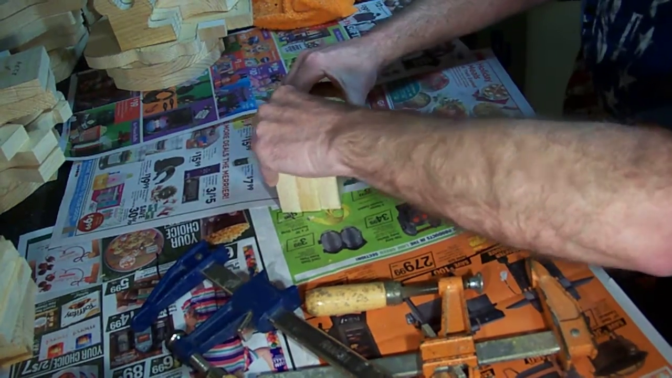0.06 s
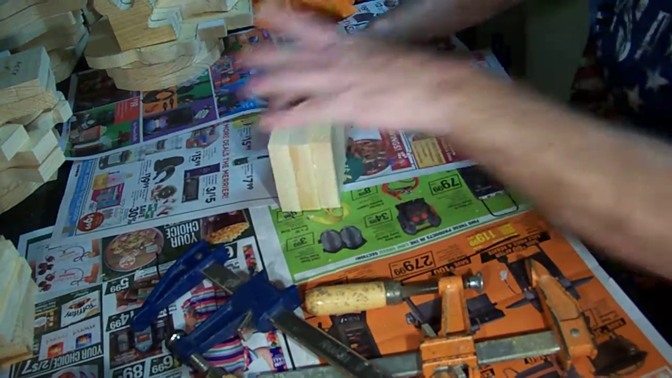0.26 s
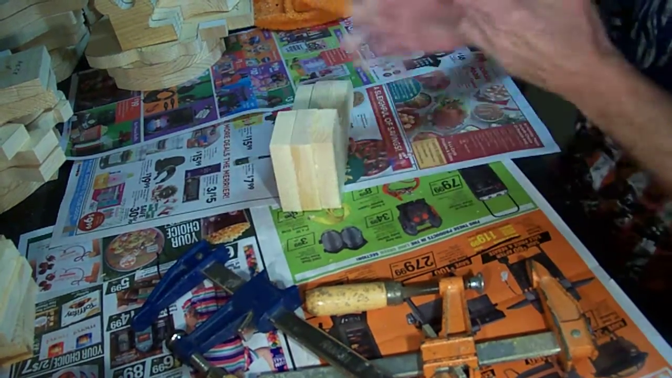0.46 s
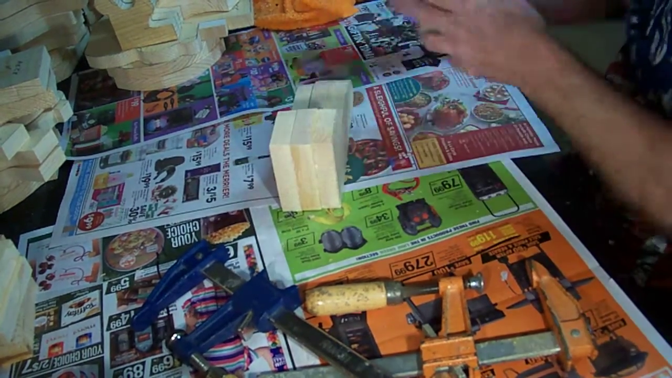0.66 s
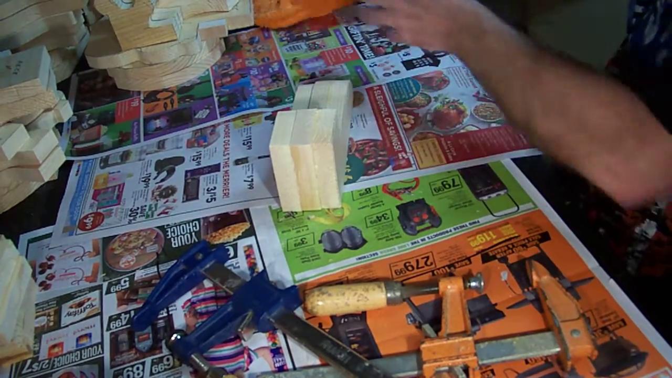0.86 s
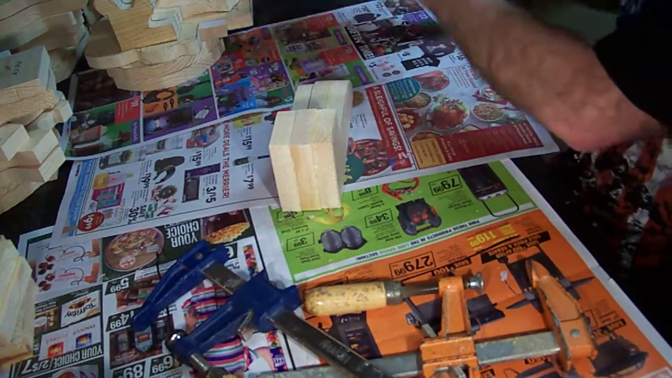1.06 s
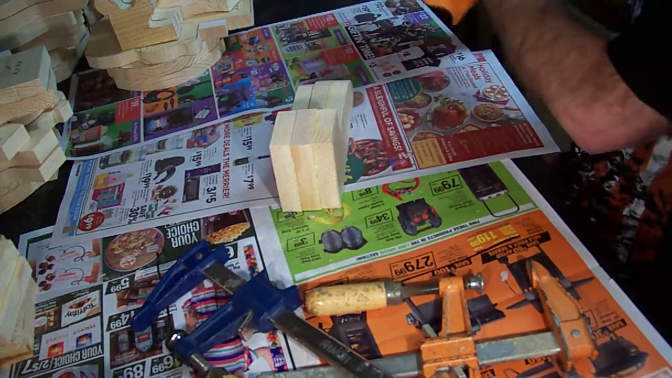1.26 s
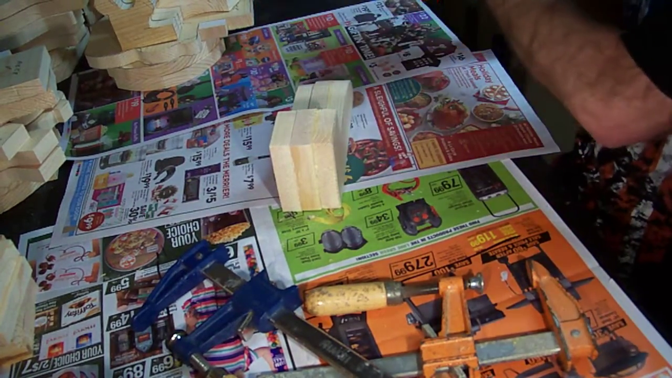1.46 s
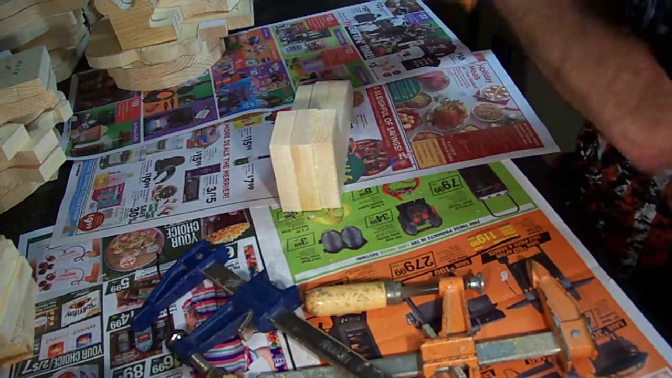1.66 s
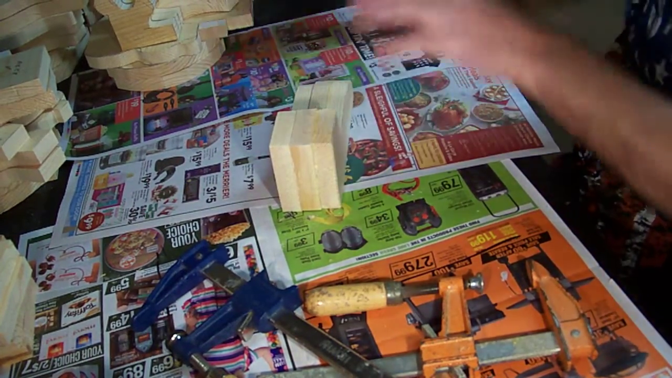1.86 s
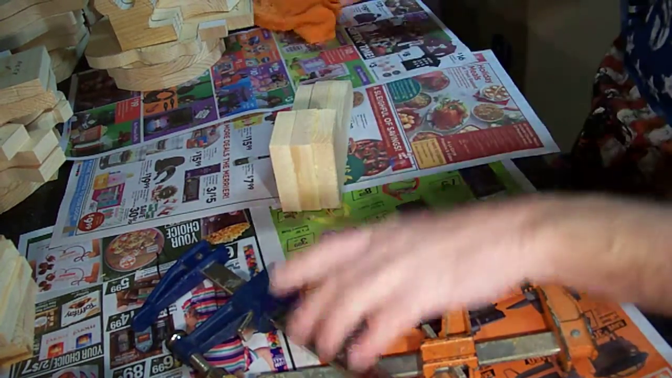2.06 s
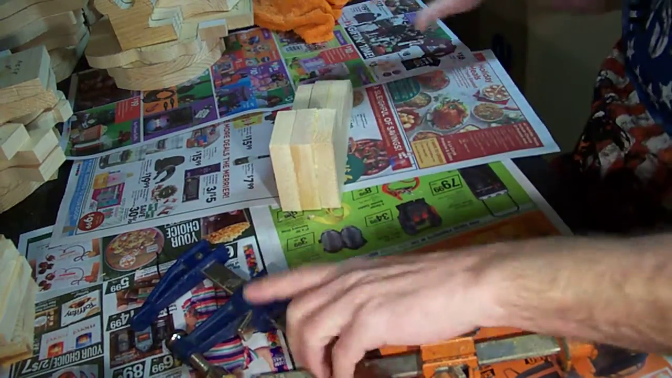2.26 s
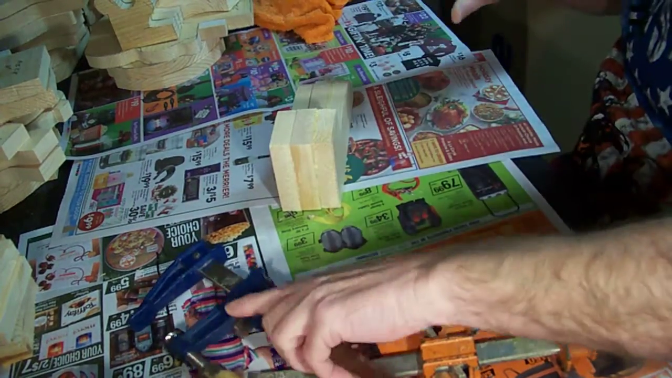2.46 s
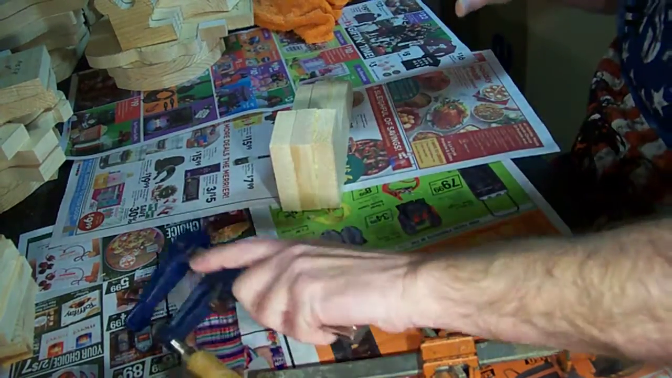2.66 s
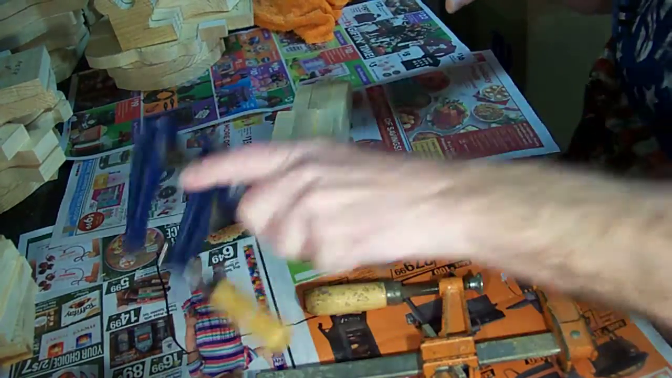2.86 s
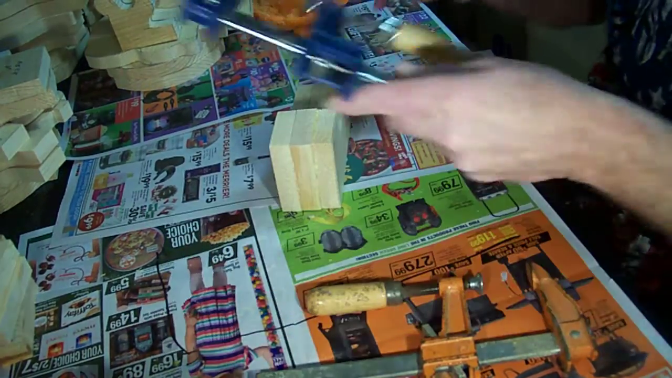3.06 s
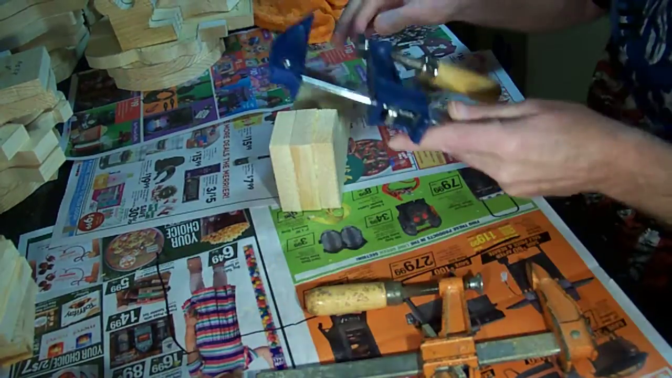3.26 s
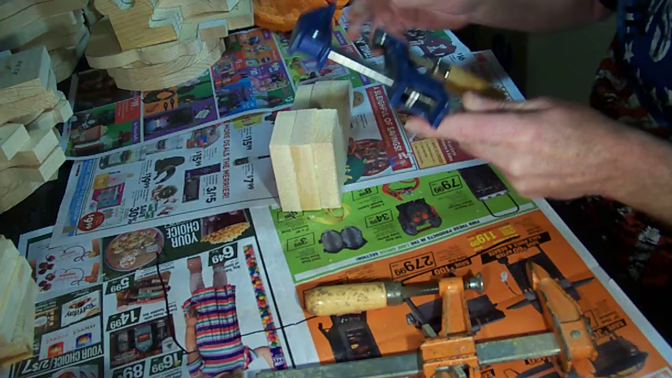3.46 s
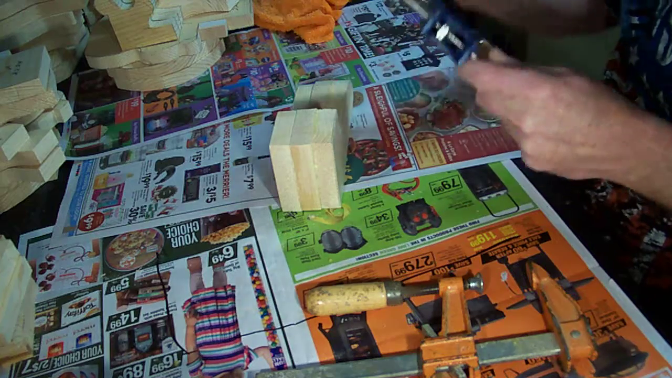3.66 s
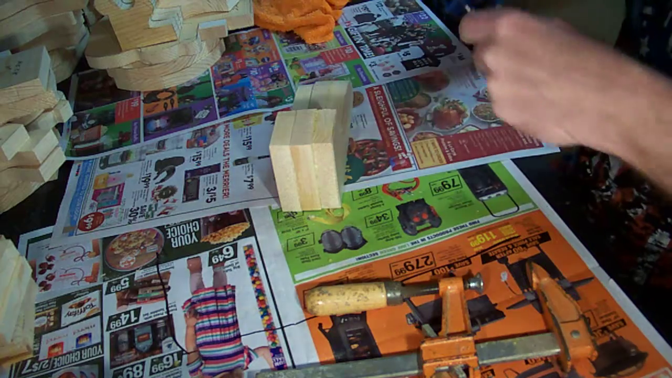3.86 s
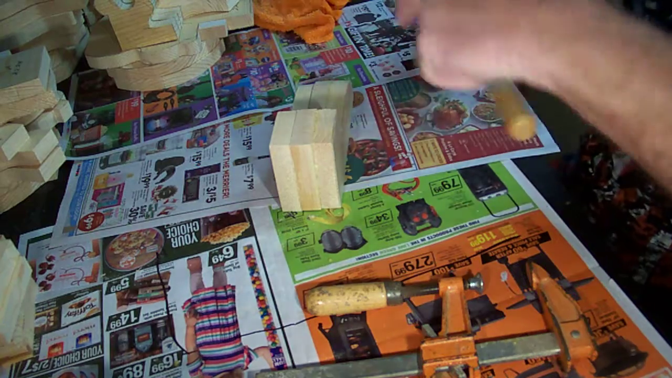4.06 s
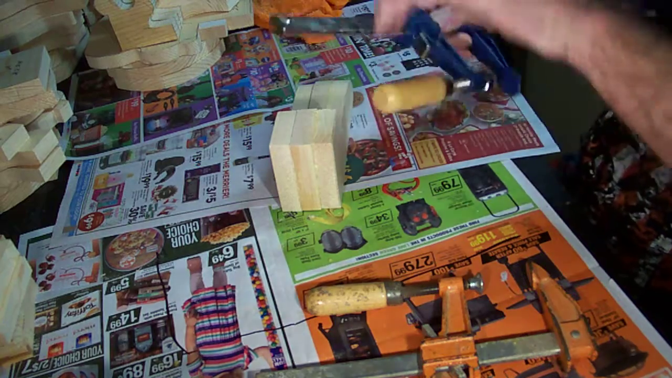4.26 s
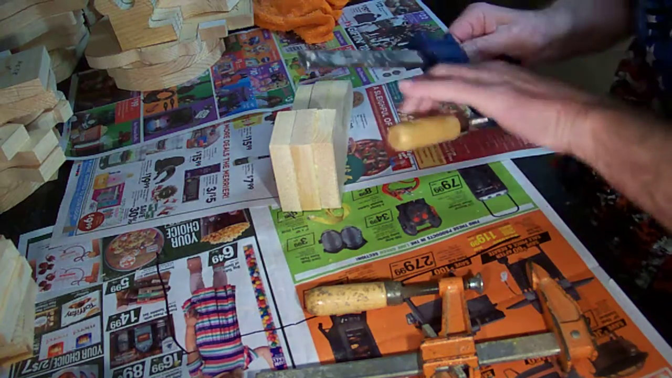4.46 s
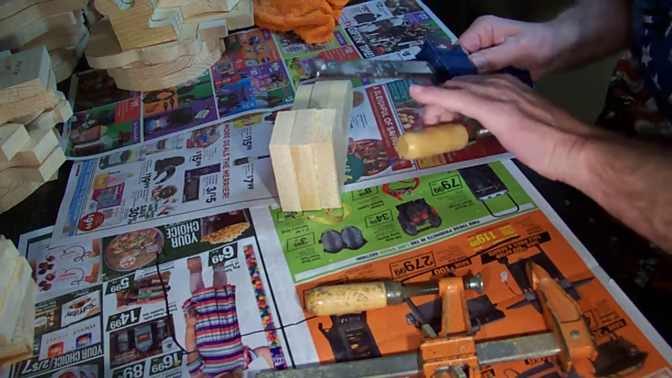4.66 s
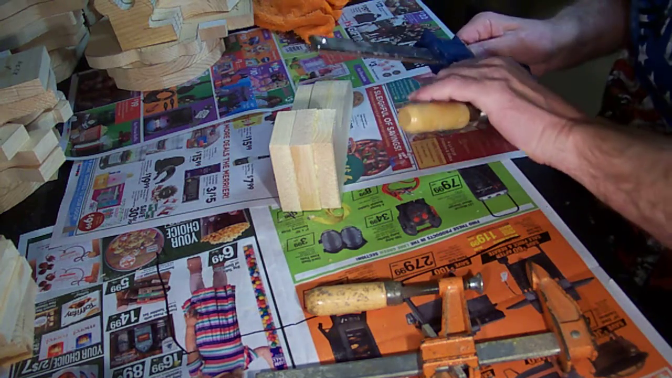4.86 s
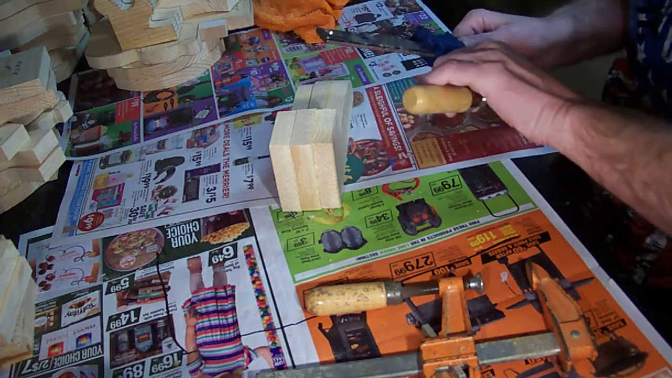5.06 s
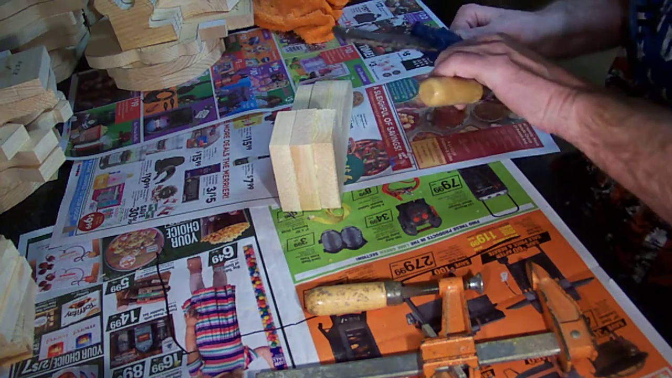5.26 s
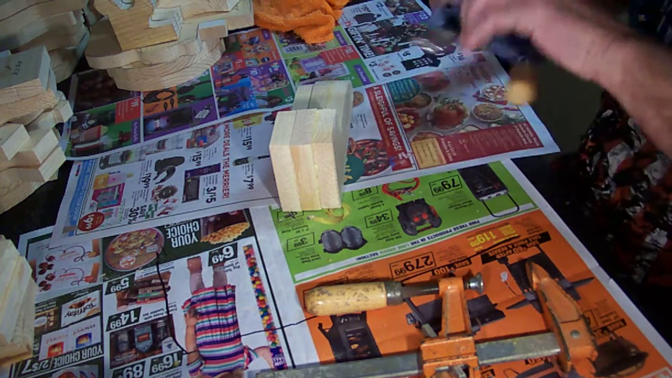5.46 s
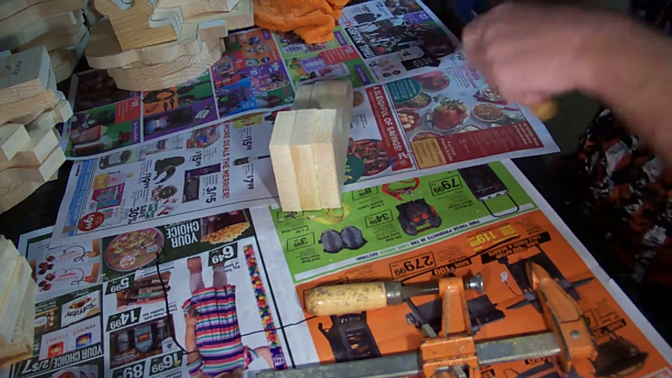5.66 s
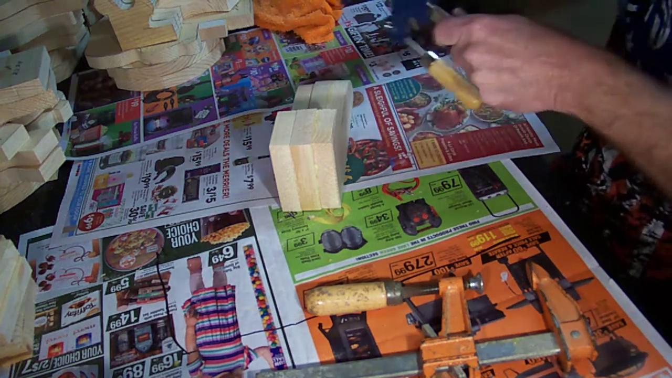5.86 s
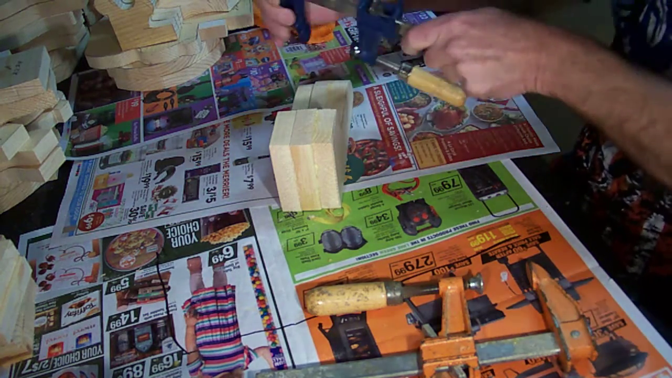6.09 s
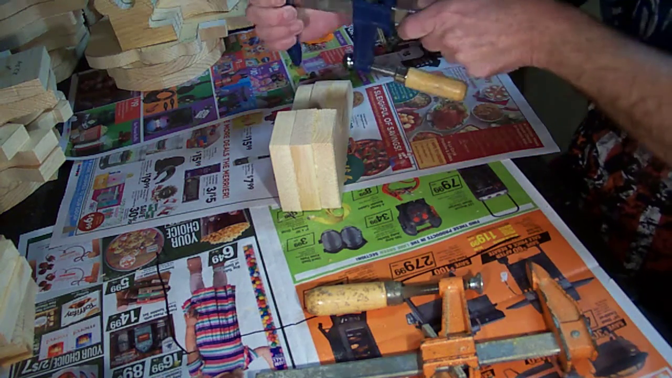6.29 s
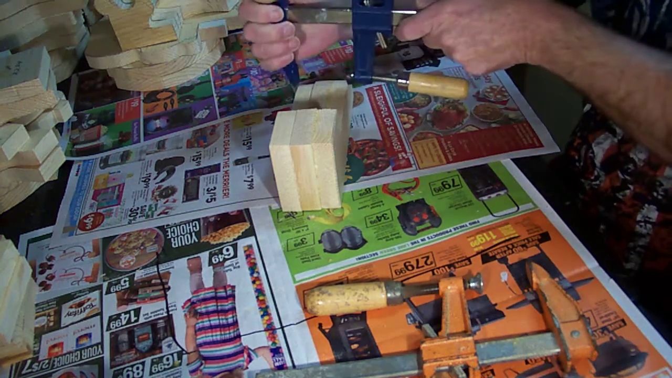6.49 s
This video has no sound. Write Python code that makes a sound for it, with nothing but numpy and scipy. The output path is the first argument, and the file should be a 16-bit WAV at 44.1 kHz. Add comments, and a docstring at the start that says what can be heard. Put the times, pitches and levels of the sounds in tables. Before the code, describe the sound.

In a small workshop, hands lightly brush wood blocks and newspaper on a table. A steel bar clamp is picked up, knocking and dragging so the tabletop thuds. Its loose jaw and screw then click, slide and rattle on the bar with a brief metallic ring. One hard snap stands out, followed by light clicks and a faint slide. The sounds are close and slightly left, over low rumble and soft hiss.

```python
"""A small workshop: low room rumble and soft hiss throughout. First, hands brush wood blocks and the
newspaper covering a table. From about 2.3 s a steel bar clamp is picked up: it knocks and drags, and
the table top thuds. From 3.2 s it is turned in the hands, and its loose jaw and screw slide, click and
rattle on the bar, making the steel ring. One hard snap lands at 5.4 s; light clicks and a faint
slide close the scene."""
import sys
import numpy as np
from scipy import signal
from scipy.fft import rfft, next_fast_len
from scipy.io import wavfile

SR = 44100
rng = np.random.default_rng(int(sys.argv[2]) if len(sys.argv) > 2 else 0)


def bounce(signal):
    """Save signal as a 16-bit WAV file at the path given by the first command-line argument."""
    frames = np.transpose(np.atleast_2d(signal))
    limited = np.clip(frames, -1, 1)
    pcm = np.round(limited * 32767).astype(np.int16)
    wavfile.write(sys.argv[1], SR, pcm)


N = 287973
HIT_T = np.arange(SR // 4) / SR  # time axis of one hit, in seconds

# jaw and screw strike the bar: start_s, level_db, pitch_hz (of the struck part), treble_db (re level)
CLICKS = [(2.2706, -20, 5070, -9), (2.3626, -43, 6250, 5), (2.367, -23.5, 2390, -10),
          (2.424, -21, 5900, -6), (2.4648, -18, 2970, -6), (2.548, -33, 3430, -17),
          (2.5596, -16.5, 3740, -12), (2.595, -28.5, 3680, -4), (2.669, -38.5, 3420, -12),
          (3.2381, -38.5, 3070, -4), (3.243, -33, 2800, -9), (3.26, -23, 3560, -6.5),
          (3.2974, -32.5, 3470, -4.5), (3.314, -43.5, 3500, -16), (3.9761, -36, 3500, -12),
          (3.9824, -38, 3580, -10), (4.055, -48, 3000, -7), (4.0616, -40.5, 4000, -3.5),
          (4.1568, -49.5, 4080, 5), (4.404, -34, 2890, -19), (4.784, -37, 4980, -13),
          (4.8065, -18.5, 2940, -8.5), (4.8428, -22, 5330, -10.5), (4.8462, -20, 6140, -14),
          (4.997, -33, 2540, -30), (5.0083, -26, 3640, -25), (5.034, -37.5, 3600, -19),
          (5.1572, -38, 2610, -24), (5.211, -42.5, 2160, -25), (5.286, -47, 2530, -16),
          (5.3142, -41.5, 2390, -30), (5.37, -33, 2650, -20), (5.379, -21, 5370, -2),
          (5.4042, -34, 2490, -25), (5.4213, -30, 6910, -9), (5.4284, -5, 5500, -0.5),
          (5.478, -31, 7200, -3), (5.6904, -35, 2920, 2.5), (5.718, -39, 4400, -3),
          (5.751, -29.5, 3610, -3), (5.7691, -26.5, 6870, -6.5), (5.8073, -39.5, 3670, -3),
          (5.8552, -31, 3540, 2), (5.893, -35, 7000, -6), (5.905, -36, 3480, -3), (5.911, -27, 7350, -1)]
# ring of the steel bar and jaw: pitch_hz, level_db, t60_s
CLAMP_MODES = [(2710, -6, .04), (2937, -1.5, .055), (3150, 0.5, 0.047), (3450, -2, 0.045),
               (3910, -3, 0.044), (4330, -6.5, 0.087), (4700, -1.5, 0.043), (4830, -3.5, .06),
               (5120, 4.5, 0.021), (5240, -6, 0.05), (5580, -2.5, .055), (6200, -2.5, 0.044),
               (6520, -7, .06), (7150, -1, 0.044), (7360, -7, 0.051), (7800, -11, .06)]
# the jaw slides along the bar: centre_s, half_length_s, level_db
JAW_SLIDES = [(3.25, 0.051, -57), (3.368, 0.075, -64), (3.962, 0.026, -59), (4.16, 0.043, -60.5),
              (4.512, 0.012, -59.5), (5.025, 0.017, -46), (5.407, 0.034, -55), (5.74, 0.037, -50.5),
              (5.885, 0.038, -58.5), (6.365, 0.37, -65.5)]
# the clamp bumps the table: start_s, thump_db, clack_db
KNOCKS = [(2.272, -34, -47.5), (2.368, -24, -22.5), (2.378, -43, -37), (2.387, -33.5, -33.5),
          (2.426, -52, -38.5), (2.467, -61, -37.5), (2.511, -31, -46), (2.562, -31, -45), (2.595, -40, -42),
          (5.429, -59, -39)]
# thud of the table top: pitch_hz, level_db, t60_s
TABLE_MODES = [(91, -8.5, 0.079), (111.8, 2.5, 0.16), (163.6, -6.5, 0.17), (191.4, 2.5, 0.075),
               (261, -7.5, 0.017), (362, -4.5, 0.03), (465, -6, 0.073), (550, -20.5, 0.11),
               (740, -25, 0.027)]
# woody tone of a knock: frequency_hz, level_db
CLACK_EQ = [(150, -6), (400, 13), (750, 5), (1000, 1), (1500, -2), (2500, -31), (5000, -17)]
# hands brush, the clamp drags: centre_s, half_length_s, hiss_db, rasp_db, pressure_db
RUBS = [(0.194, 0.021, -51, -76, -50.5), (0.324, 0.015, -49.5, -75, -72), (.33, 0.19, -64.5, -66.5, -59.5),
        (1.655, 0.021, -50, -51.5, -55), (2.057, 0.012, -41.5, -58, -43.5),
        (2.096, 0.018, -45.5, -58, -36.5), (2.246, 0.031, -65, -72, -48), (2.385, 0.017, -48.5, -54, -33.5),
        (2.446, 0.034, -52.5, -61, -41), (2.555, 0.015, -42, -50, -37), (2.606, 0.038, -49.5, -67, -36.5),
        (2.714, 0.052, -74, -79, -48.5)]
# bright hiss of sliding surfaces: frequency_hz, level_db
FRICTION_EQ = [(600, -18), (1300, -12.5), (2200, -5.5), (3300, 2), (5000, 1), (7500, -5)]
# midrange scrape of paper: frequency_hz, level_db
SCRAPE_EQ = [(200, -13.5), (380, 4), (550, 3), (800, -6.5), (1200, -5), (2200, -22.5)]
# low end of rubbing pressed into the table: frequency_hz, level_db
PRESSURE_EQ = [(40, -20.5), (85, 1.5), (120, 0.5), (175, 0.5), (240, -11), (400, -40.5)]
# slaps off hard surfaces nearby: delay_s, level_db, pan_db (left over right)
ECHOES = [(.0021, -23, 3), (.0063, -18.5, -13.5), (.0082, -26, 10)]
# low bed of the room tone: frequency_hz, level_db
ROOM_RUMBLE_EQ = [(10, 0), (22, 5), (31, -4.5), (43, 3.5), (56, 1), (76, -1.5), (97, 4.5), (135, -11.5),
                  (195, -11), (260, -26.5), (450, -34.5), (750, -25), (1100, -37), (4000, -50)]
# airy bed of the room tone: frequency_hz, level_db
ROOM_HISS_EQ = [(100, 9), (450, 4.5), (750, 2), (1100, 0.5), (2000, -1.5), (4000, -3), (7200, -6)]
# notches in the microphone's response: frequency_hz, width_hz
MIC_DIPS = [(300, 102), (962, 69)]

MEDIUM_BLOW_DB, MEDIUM_PART_HZ, MEDIUM_TREBLE_DB = -36.5, 3500, -11  # a middling click
LEFT_PAN_DB, NEAR_CENTRE_PAN_DB = 8.5, 1
RING_SPREAD_DB = 3.5  # hit-to-hit variation of each clamp mode


def clamp_clicks(damped_until_s=3.6, part_t60_s=0.02, take_up_s=0.0005):
    """Steel hits steel: each contact cracks, wakes the bar and chatters on the loose part it struck."""
    out = np.zeros((2, N))
    for start_s, level_db, pitch_hz, treble_db in CLICKS:
        hardness_db = level_db - MEDIUM_BLOW_DB
        damping_db = 4 * (start_s < damped_until_s)  # the early clicks ring less
        force = contact(chatter_db=17.5 + 0.5 * hardness_db)
        part_ring = signal.fftconvolve(force, ringing([(pitch_hz, 0, part_t60_s)], spread_db=0))
        # hard blows on heavy, low-ringing parts carry the most body
        body_db = -28 + 0.22 * hardness_db - 6.5 * np.log2(pitch_hz / MEDIUM_PART_HZ)
        # a soft contact with little treble also cracks less
        crack_db = -13 + 0.24 * (treble_db - MEDIUM_TREBLE_DB)
        # a light touch mostly rings, a hard one mostly cracks
        ring_db = -6 - 0.47 * hardness_db - damping_db
        layers = [(band(force, 800, 1900), body_db, NEAR_CENTRE_PAN_DB),
                  (band(force, 2630, 4940, order=3), crack_db, LEFT_PAN_DB),
                  (band(force, 4640, 9160, order=3), treble_db - 2, NEAR_CENTRE_PAN_DB),
                  (ringing(CLAMP_MODES, RING_SPREAD_DB), -14 - damping_db, NEAR_CENTRE_PAN_DB),
                  (part_ring[:len(force)], ring_db, LEFT_PAN_DB)]
        for sound, trim_db, pan_db in layers:
            layer = from_db(level_db + trim_db) * burst(sound, seconds=0.0023)
            add(out, start_s + take_up_s, panned(layer, pan_db))
    left, right = out
    return np.array([left, np.append(0, right[:-1])])  # off to the left: the right hears it a sample late


def sliding_jaw(ticks_per_s=60, slide_db=-3, crack_db=-6.5, ring_db=-9, size_spread_db=3):
    """Steel slides on steel; random light ticks ride the motion and wake the bar."""
    motion = sum(from_db(db) * swell(centre_s, half_s) for centre_s, half_s, db in JAW_SLIDES)
    catches = rng.random(N) < ticks_per_s / SR
    sizes = from_db(size_spread_db * rng.standard_normal(N))
    ticks = motion * rms_one(catches * sizes)
    crack = from_db(crack_db) * burst(band(contact(chatter_db=13.5), 1500, 6000), 1 / SR)
    ring = from_db(ring_db) * burst(ringing(CLAMP_MODES, RING_SPREAD_DB), 1 / SR)
    slide = from_db(slide_db) * motion * friction()
    return slide + panned(signal.fftconvolve(ticks, crack + ring)[:N], LEFT_PAN_DB)


def contact(chatter_db, decay_s=0.002):
    """The force of a hit: a sharp first touch and a dying flurry of tiny rebounds."""
    rebounds = rng.standard_normal(len(HIT_T)) * np.exp(-HIT_T / decay_s)
    force = from_db(chatter_db) * burst(rebounds, 1 / SR)
    force[0] += 1
    return force


def ringing(modes, spread_db):
    """A struck body rings as decaying sines; every blow balances them anew."""
    hz, db, t60_s = np.transpose(modes)[:, :, None]
    strength = from_db(db + spread_db * rng.standard_normal(hz.shape)) * rng.choice([-1, 1], hz.shape)
    decay = from_db(-60 * HIT_T / t60_s)
    return np.sum(strength * decay * np.sin(2 * np.pi * hz * HIT_T), axis=0)


def table_knocks(clack_decay_s=0.0079):
    """Each bump gives a short woody clack and sets the table top thudding."""
    out = np.zeros((2, N))
    for start_s, thump_db, clack_db in KNOCKS:
        thump = burst(ringing(TABLE_MODES, spread_db=7.5), seconds=0.0049)
        wood_noise = colour(rng.standard_normal(len(HIT_T)), CLACK_EQ)
        clack = burst(wood_noise * np.exp(-HIT_T / clack_decay_s), seconds=0.0017)
        attack = burst(band(1.0 * (HIT_T == 0), 230, 1700, order=1), seconds=0.0007)
        knock = from_db(thump_db) * thump + from_db(clack_db) * (clack + attack)
        add(out, start_s, panned(knock, 0.3))
    return out


def rubbing(scrape_db=-7.5):
    """Fibres hiss and rasp under each stroke; pressure drives scrape and rumble into the table."""
    power = sum((from_db(levels)[:, None] * swell(centre_s, half_s)) ** 2
                for centre_s, half_s, *levels in RUBS)
    hiss, rasp, pressure = np.sqrt(power)
    scrape = from_db(scrape_db) * np.sqrt(hiss * pressure) * colour(rng.standard_normal(N), SCRAPE_EQ)
    rumble = pressure * colour(rng.standard_normal(N), PRESSURE_EQ)
    grains = friction()
    return hiss * grains + rasp * rms_one(band(grains, 800, 2600)) + rumble + scrape


def friction(grain_db=6.0, width=0.72, pan_db=4.0):
    """Surfaces catch and let go in dense grains: a wide, gritty hiss."""
    grains = rng.standard_normal((2, N)) * from_db(grain_db * np.minimum(rng.exponential(1, (2, N)), 5))
    mid, side = colour(grains, FRICTION_EQ)
    return panned(mid, pan_db) + width * side * [[1], [-1]]


def workshop_reverb(x, near_db=-11, near_t60_s=0.093, far_db=-23, far_t60_s=0.2):
    """A tight space: scatter off the cluttered table, a faint room tail and a few hard slaps."""
    response = np.zeros((2, len(HIT_T)))
    for level_db, t60_s in (near_db, near_t60_s), (far_db, far_t60_s):
        scatter = rng.standard_normal(response.shape) * from_db(-60 * HIT_T / t60_s)
        response += from_db(level_db) * burst(scatter, 2 / SR)
    for delay_s, level_db, pan_db in ECHOES:
        add(response, delay_s, panned(from_db([level_db]), pan_db))
    return x + signal.fftconvolve(x, response, axes=1)[:, :N]


def room_tone(rumble_db=-48.5, hiss_db=-57.5, rumble_width=0.16, hiss_width=0.65):
    """A steady bed: near-mono rumble under a wide, soft hiss."""
    out = 0
    for eq, db, width in (ROOM_RUMBLE_EQ, rumble_db, rumble_width), (ROOM_HISS_EQ, hiss_db, hiss_width):
        mid, side = colour(rng.standard_normal((2, N)), eq)
        out = out + from_db(db) * (mid + width * side * [[1], [-1]])
    return out


def from_db(db):
    """Decibels to gain."""
    return 10 ** (np.asarray(db) / 20)


def rms_one(x):
    """Scale to rms 1."""
    return x / np.sqrt(np.mean(x ** 2) + 1e-20)


def burst(x, seconds):
    """Scale to the energy that rms 1 has over so many seconds."""
    return x * np.sqrt(seconds * SR / (np.sum(x ** 2) + 1e-20))


def band(x, low_hz, high_hz, order=2):
    """Causal band-pass."""
    sos = signal.butter(order, [low_hz, high_hz], "band", fs=SR, output="sos")
    return signal.sosfilt(sos, x + 1e-18)


def colour(x, eq):
    """Shape noise with an EQ curve of (frequency_hz, level_db) points; rms 1."""
    hz, db = np.transpose(eq)
    size = next_fast_len(x.shape[-1])
    log_hz = np.log(np.fft.rfftfreq(size, 1 / SR) + 1e-3)
    gain = from_db(np.interp(log_hz, np.log(hz), db))
    return rms_one(np.fft.irfft(rfft(x, size) * gain, size)[..., :x.shape[-1]])


def swell(centre_s, half_s):
    """Bell-shaped fade in and out for one stroke."""
    return np.exp(-.5 * np.minimum(((np.arange(N) / SR - centre_s) / half_s) ** 2, 100))


def panned(x, pan_db):
    """Mono to stereo, the left louder by pan_db."""
    return x * from_db(np.array([[pan_db], [-pan_db]]) / 2)


def add(out, start_s, x):
    """Drop a short stereo sound into the mix."""
    at = round(start_s * SR)
    out[:, at:at + x.shape[-1]] += x[:, :N - at]


def scene():
    """Clamp and handling over the room tone; only the clicks feed the reverb."""
    return room_tone() + workshop_reverb(clamp_clicks()) + table_knocks() + rubbing() + sliding_jaw()


def record(dry, top_hz=7236, cutoff_hz=9650):
    """A small microphone rounds the hardest peak, cuts two notches and dulls the top."""
    x = np.tanh(dry)
    for hz, width_hz in MIC_DIPS:
        x = signal.lfilter(*signal.iirnotch(hz, hz / width_hz, fs=SR), x)
    x = signal.sosfilt(signal.butter(14, top_hz, fs=SR, output="sos"), x)
    return signal.sosfilt(signal.ellip(8, .1, 70, cutoff_hz, fs=SR, output="sos"), x)


dry = scene()
out = record(dry)
bounce(out)
```